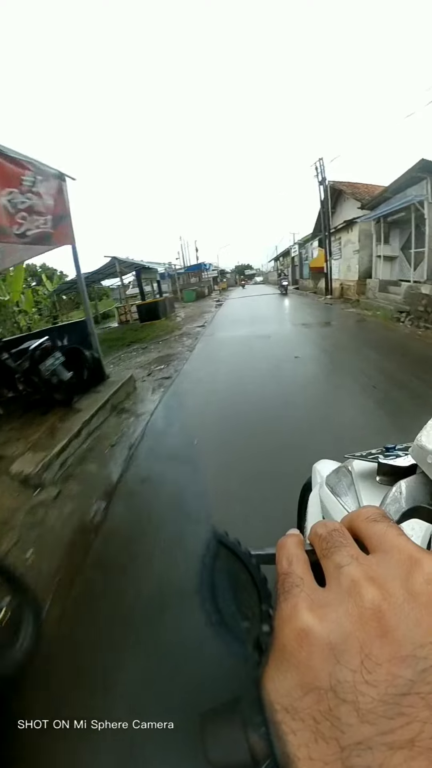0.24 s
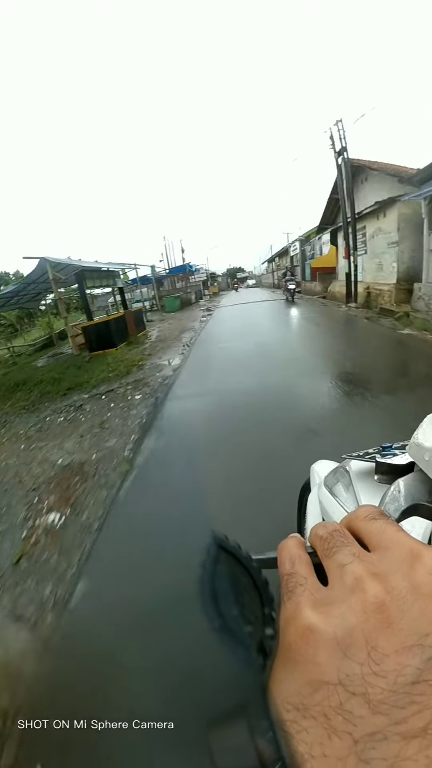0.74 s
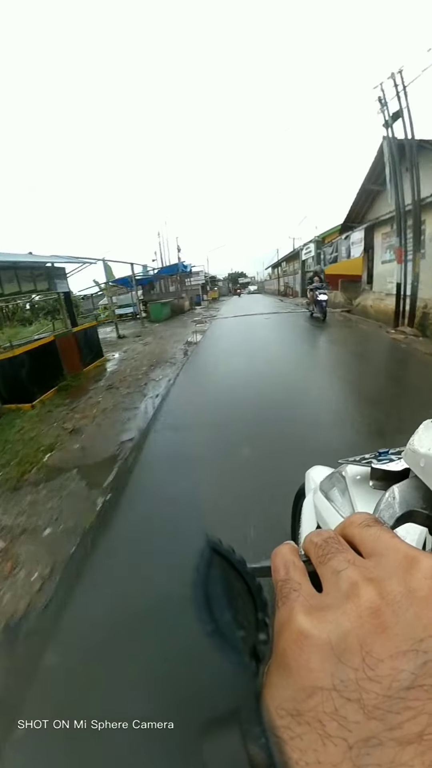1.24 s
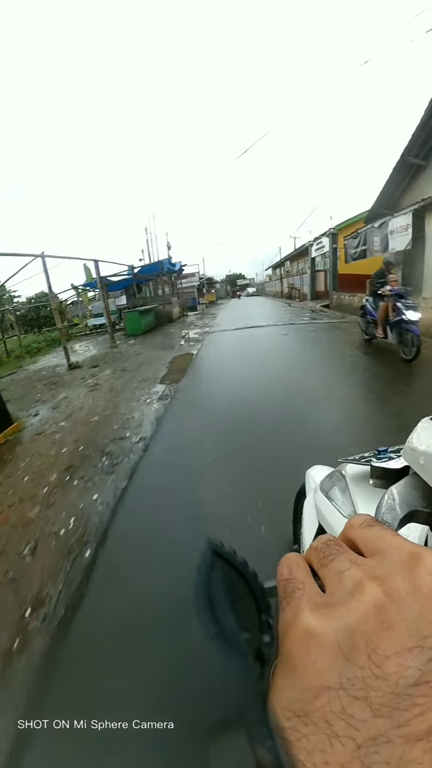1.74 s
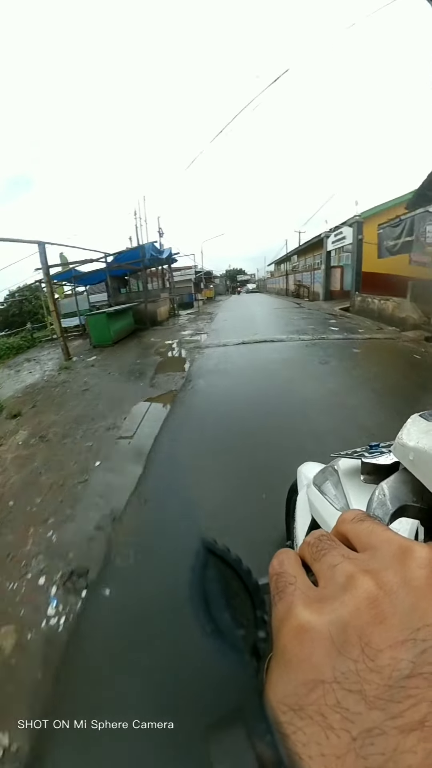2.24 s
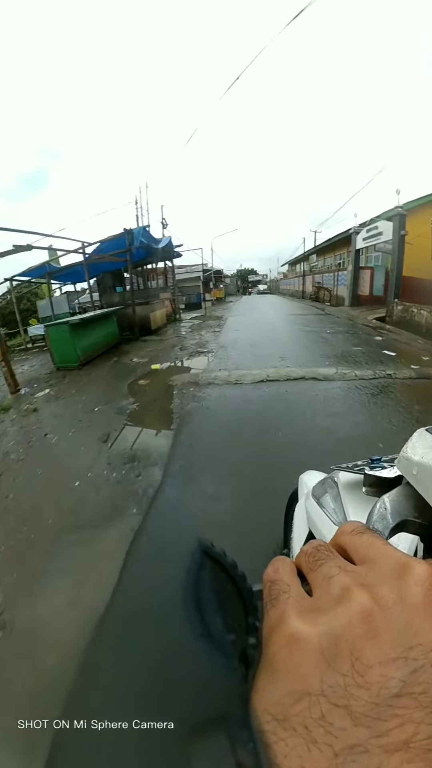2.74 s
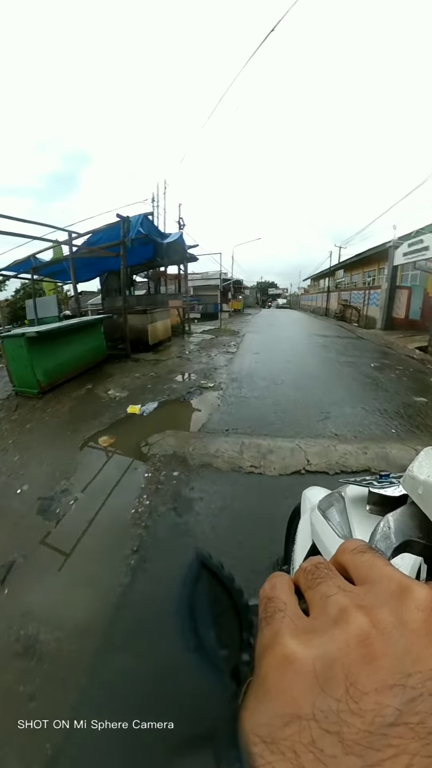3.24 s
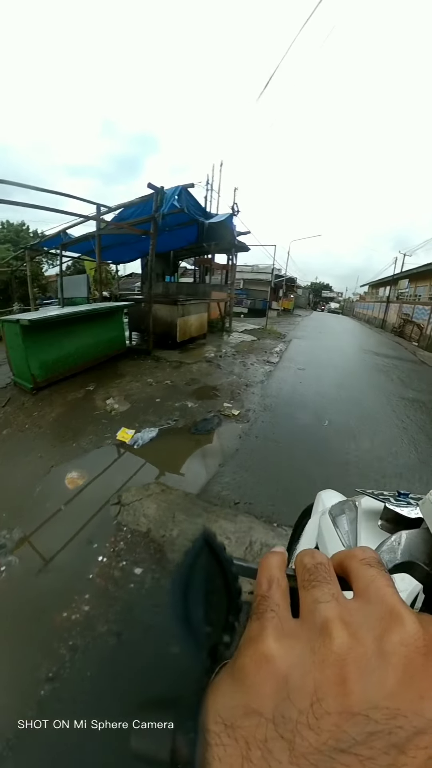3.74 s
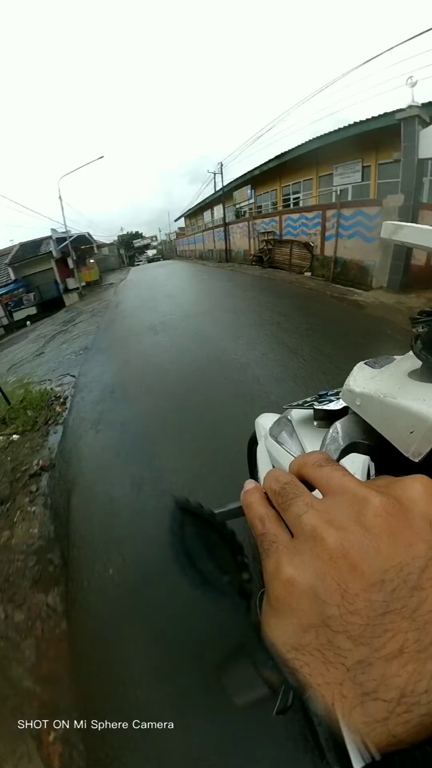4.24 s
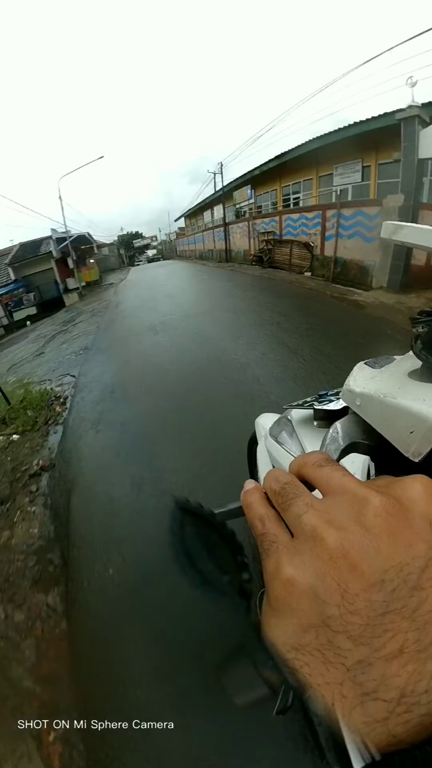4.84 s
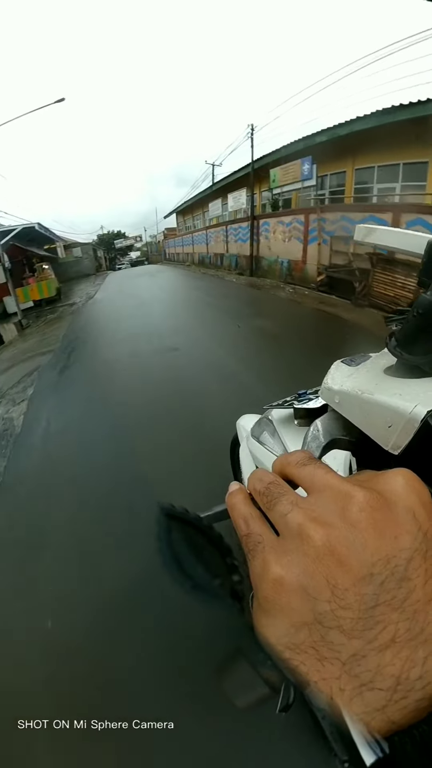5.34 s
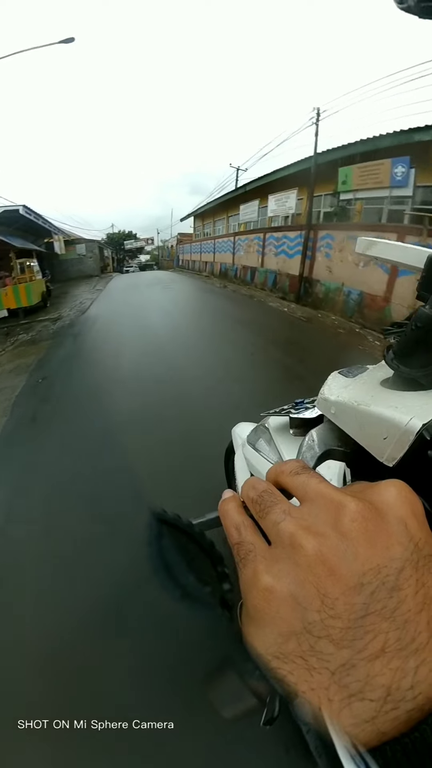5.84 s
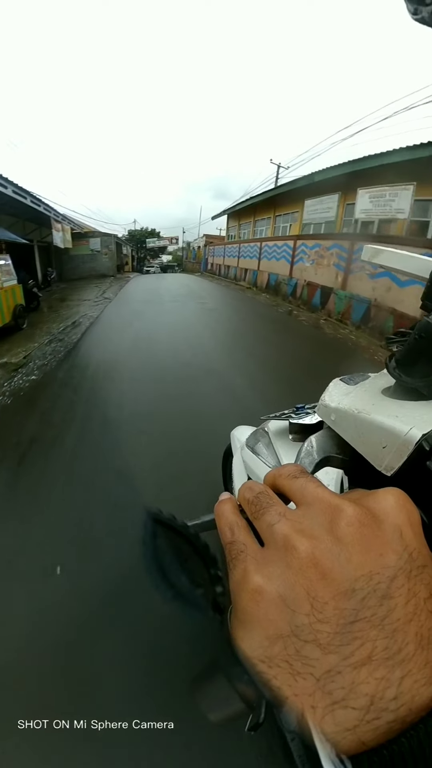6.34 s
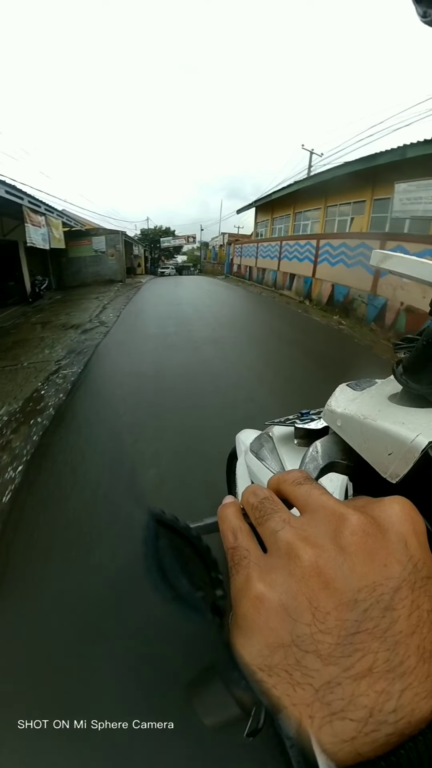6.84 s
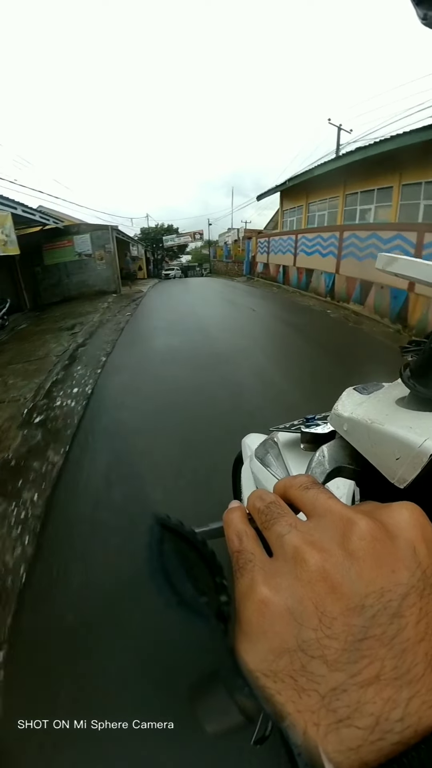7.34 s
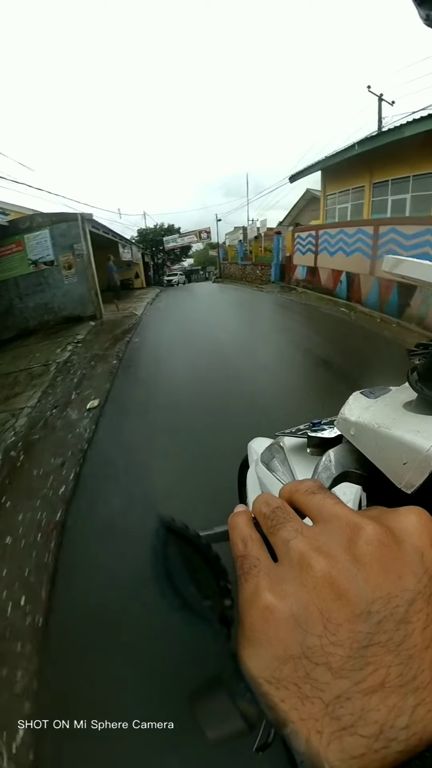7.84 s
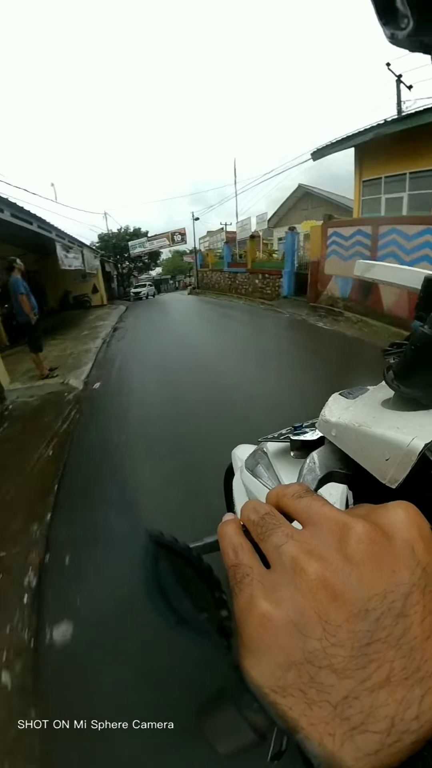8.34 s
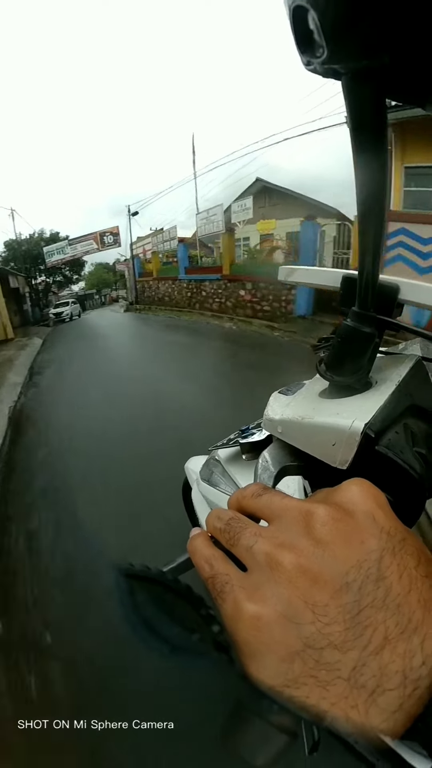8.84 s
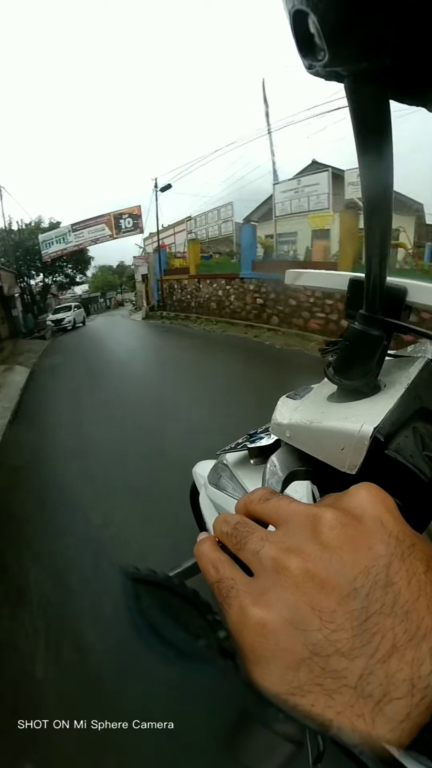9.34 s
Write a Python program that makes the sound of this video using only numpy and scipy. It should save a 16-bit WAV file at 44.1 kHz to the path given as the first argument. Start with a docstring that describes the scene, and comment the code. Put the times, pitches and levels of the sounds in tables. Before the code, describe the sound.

From 0 to 3.5 seconds a scooter coasts and slows on a wet road, heard close at the handlebar: low soft putter, fading belt whirr, broad tyre hiss and faint microphone hiss. Light plastic ticks come near 1.4 and 1.6, with a short high squeak at 1.55 and another scooter's whirr passing around 1.7. A faint panel drone swells near 2.1. Brake rub rises toward 2.9, faintly singing; panels clatter over a low bump at 3.2-3.55. From 3.6 to about 4.25 there is silence. Sound returns with very loud electrical pops at 4.4, 4.6 and 5.1, each ducking the rest before it recovers; a small puddle splash at 4.7 is mostly buried. The engine now pulls at a faster putter, belt whirr and thin rising whine strongest around 6.5-7.5, with dry panel knocks from 6 to 7.4. It eases slightly, rattles at 8.7-8.85, ticks at 9.2 and continues to 9.6.

```python
"""Scooter on a wet village road

Heard from the handlebar: the scooter coasts on hissing tyres, squeaks as another scooter passes, brakes
and rattles over a bump. The microphone cuts out and comes back with electrical pops into a limiter.
Then the engine pulls: low harmonics and gated noise make its putter, band-shaped noise the belt drive,
a gliding sine the thin whine, and short decaying rings with noise cracks the ticks of the panels."""
import sys
import numpy as np
from scipy import signal
from scipy.fft import rfft, irfft, next_fast_len
from scipy.io import wavfile
from scipy.ndimage import map_coordinates

SR = 44100
rng = np.random.default_rng(int(sys.argv[2]) if len(sys.argv) > 2 else 0)


def store_wav(level_fs):
    """Save 16-bit WAV to argv[1]."""
    pcm = np.round(np.clip(np.atleast_2d(level_fs), -1, 1) * 32767)
    wavfile.write(sys.argv[1], SR, pcm.T.astype(np.int16))


N = 422919  # samples, about 9.6 s

# Noise of belt and rollers in their case: (frequency [Hz], density [dB per Hz, relative])
DRIVE_SPECTRUM = [(900, -44), (1150, -13.5), (1300, -6.5), (1460, -1.5), (1620, -4), (1740, 0.5),
                  (1900, -3), (2050, -11), (2220, -15), (2380, -12.5), (2520, -15), (2680, -6), (2900, -16),
                  (3150, -23), (4000, -33.5), (6000, -62)]
# Noise of the plastic bodywork: (frequency [Hz], density [dB per Hz, relative])
PANEL_SPECTRUM = [(300, -20), (600, -23.5), (950, -5.5), (1150, -12.5), (1750, 7), (2350, -4), (2780, 3.5),
                  (3000, -14.5), (3300, -14.5), (6000, -35.5), (10000, -50)]


def amp(db):
    """Decibels to gain."""
    return 10 ** (np.asarray(db) / 20)


def unit(x):
    """Scale to rms 1."""
    return x / np.sqrt(np.mean(x ** 2) + 1e-20)


def curve(rows):
    """One value per sample from (time [s], value) rows."""
    return np.interp(np.arange(N) / SR, *np.transpose(rows))


def swell(at_s, width_s):
    """A bell-shaped gain round one moment."""
    return np.exp(-((np.arange(N) / SR - at_s) / width_s) ** 2)


def stroke(start_s, end_s, attack, release):
    """Full gain from start to end; attack and release are seconds per 20 dB."""
    t = np.arange(N) / SR
    before = np.maximum(start_s - t, 0)
    after = np.maximum(t - end_s, 0)
    return amp(-20 * (before / attack + after / release))


def wobble(rate):
    """A smooth random curve with rate knots a second."""
    knots = rng.standard_normal(int(N * rate / SR) + 4)
    return map_coordinates(knots, [np.arange(N) * rate / SR])


def filtered(x, response):
    """Shape x by a gain that is a function of frequency."""
    m = next_fast_len(N + 8192)
    gain = response(np.fft.rfftfreq(m, 1 / SR))
    return irfft(rfft(x, m) * gain, m)[:N]


def coloured(x, spectrum):
    """Filter x through (frequency [Hz], gain [dB]) points on a log axis, falling away beyond the ends."""
    f, db = np.transpose(spectrum)
    knots = np.log(np.r_[f[0] / 2, f, f[-1] * 2])
    levels = np.r_[db[0] - 20, db, db[-1] - 20]
    return filtered(x, lambda hz: amp(np.interp(np.log(hz + 1), knots, levels)))


def noise(spectrum, gate=1):
    """Gated white noise through a fixed resonant body, rms 1."""
    return unit(coloured(gate * rng.standard_normal(N), spectrum))


def tone(hz):
    """A sine of rms 1 that follows a pitch curve."""
    return np.sqrt(2) * np.sin(2 * np.pi * np.cumsum(hz) / SR)


def puffs(cycle, depth, sharpness):
    """A gate that swells once in each firing cycle."""
    return 1 + depth * np.exp(sharpness * (np.cos(2 * np.pi * cycle) - 1))


def engine(firing_hz, throttle, hum_db, exhaust_db):
    """Low harmonics of the firing rate, and a puff of gas through the silencer at every firing."""
    # (multiple of the firing rate, coasting level [dB], pulling level [dB])
    harmonics = [(1, -34, -8), (2, -22, 2.5), (3, 0, -14.5), (5, -8, -22), (6, -11, -9.5), (7, -14, -6.5),
                 (9, -9, -9), (10, -11, -20), (11, -14, -18)]
    # Exhaust noise while coasting, then pulling: (frequency [Hz], density [dB per Hz, relative])
    coast_spectrum = [(35, -35), (60, -12), (90, -10), (160, -12.5), (220, -17), (280, -4.5), (335, -7),
                      (400, -0.5), (470, -1.5), (530, -8.5), (600, -19), (720, -9.5), (930, -4.5),
                      (1100, -6.5), (1500, -36)]
    pull_spectrum = [(35, -29), (52, -16.5), (100, -11.5), (200, -12), (290, -11), (345, -7), (410, -1),
                     (470, -1), (530, -3), (600, -12.5), (720, -11), (940, -5.5), (1100, -15), (1500, -40)]
    hum = np.zeros(N)
    for multiple, coast_db, pull_db in harmonics:
        level_db = coast_db + throttle * (pull_db - coast_db) + 2.3 * wobble(8)
        hum += amp(level_db) * tone(round(multiple) * firing_hz)
    gate = puffs(np.cumsum(firing_hz) / SR, depth=0.483, sharpness=2.7) * amp(1.1 * wobble(45))
    coasting = amp(-1.42) * (1 - throttle) * noise(coast_spectrum, gate)
    pulling = throttle * noise(pull_spectrum, gate)
    exhaust = amp(exhaust_db) * (coasting + pulling)
    return amp(hum_db) * hum + boom(firing_hz, throttle) + exhaust


def boom(firing_hz, throttle, coast_db=-52, fade_db_per_s=5.5, load_at_s=6.65, load_width_s=1.1,
         fourth_db=-59.5, tenth_db=-60):
    """The silencer booms on two harmonics: the fourth fades while coasting, and both swell under load."""
    coasting = (1 - throttle) * amp(coast_db - fade_db_per_s * np.arange(N) / SR)
    loaded = amp(fourth_db) * swell(load_at_s, load_width_s)
    fourth = (coasting + loaded) * amp(1.3 * wobble(6.5))
    tenth = throttle * amp(tenth_db + wobble(6)) * swell(load_at_s, 2.0 * load_width_s)
    return fourth * tone(4 * firing_hz) + tenth * tone(10 * firing_hz)


def speed_level(speed_hz, throttle):
    """Exhaust level in dB: it follows road speed, coasting or pulling, down to an idle floor."""
    # (level at the start of the coast [dB], loss while coasting [dB per 100 Hz of whine pitch],
    #  level pulling at top speed [dB], loss below top speed [dB per 100 Hz])
    exhaust_law = (-44.8, 7, -45.4, 2.6)
    idle_db = -59.5
    coast_db, coast_slope, pull_db, pull_slope = exhaust_law
    slowed = (speed_hz[0] - speed_hz) / 100
    below_top = (speed_hz.max() - speed_hz) / 100
    coasting = (1 - throttle) * (coast_db - coast_slope * slowed)
    pulling = throttle * (pull_db - pull_slope * below_top)
    return np.maximum(coasting + pulling, idle_db)


def belt_drive(firing_hz, throttle, shake_db, clutch_out_s=3.05, clutch_fade=0.25):
    """Belt and rollers chatter in their ringing case; the belt runs down as the scooter crawls."""
    # Whirr before the trims below, building under load: (time [s], level [dB])
    whirr_level = [(0, -42), (0.6, -45.5), (1.3, -48.5), (2.2, -48.5), (3.05, -54), (4.3, -42),
                   (5.8, -38.5), (6.45, -34.5), (7.6, -34.8), (8.6, -38), (9, -40.5), (9.58, -40)]
    gate = puffs(np.cumsum(firing_hz) / SR, depth=0.19, sharpness=3) * amp(1.19 * wobble(220))
    # the clutch fades are in seconds per 20 dB
    clutch = np.maximum(throttle, stroke(0, clutch_out_s, clutch_fade, clutch_fade))
    level_db = curve(whirr_level) + shake_db - 3.0 + 1.218 * throttle + 0.65 * wobble(12)
    return clutch * amp(level_db) * noise(DRIVE_SPECTRUM, gate)


def whine(speed_hz, ring_hz=1735, ring_db=-42, ring_at_s=7.044, ring_width_s=0.483):
    """The whine swells at each case resonance it crosses; near top speed the case sings its own note."""
    # Resonances of the drive case: (frequency [Hz], half width at half gain [Hz], level [dB])
    case_modes = [(1191.8, 18.5, -56), (1430, 10, -48), (1458, 13, -36), (1515, 30, -51), (1551, 10, -42)]
    sweep = sum(amp(db) / (1 + ((speed_hz - hz) / width) ** 2) for hz, width, db in case_modes)
    ring = amp(ring_db) * swell(ring_at_s, ring_width_s)
    out = np.zeros(N)
    for hz, gain in ((speed_hz, sweep), (ring_hz, ring)):
        pitch = hz * (1 + 0.005 * wobble(90))
        out += gain * amp(1.8 * wobble(35)) * tone(pitch)
    return out


def tyres(puddle_at_s=4.66, splash_db=-52):
    """The tread flings water off the asphalt in a fine spray, and splashes through one puddle."""
    # Wet hiss before an 8.5 dB lift: (time [s], level [dB])
    wet_level = [(0, -56.5), (2.6, -58), (3.58, -60.5), (4.3, -64.5), (6.3, -66), (7, -70.5), (9.58, -70)]
    # Hiss of the tread, then the splash: (frequency [Hz], density [dB per Hz, relative])
    tyre_spectrum = [(100, 3.5), (600, -5.5), (900, 8), (1100, -3), (1250, 2), (1800, 7.5), (2350, -2),
                     (2700, 10), (2900, 7.5), (3150, -4.5), (3900, -2.5), (4550, -1.5), (5000, -5),
                     (5800, -6.5), (6600, -9.5), (7600, -22.5), (12000, -46.5)]
    spray_spectrum = [(2500, -10.5), (4300, 4), (5100, -6.5), (5900, -3), (7000, -13.5), (9000, -21.5)]
    burst = amp(splash_db) * stroke(puddle_at_s, puddle_at_s, attack=0.035, release=0.098)
    splash = burst * noise(spray_spectrum, amp(2.1 * wobble(400)))
    hiss_db = curve(wet_level) + 8.5 + 0.48 * wobble(7.1)
    return splash + amp(hiss_db) * noise(tyre_spectrum, amp(1.0 * wobble(500)))


def panel_drone(hz=380, db=-62.5, at_s=2.108, width_s=0.7):
    """A body panel drones at its resonance: an unsteady tone that swells and fades once."""
    pitch = hz * (1 + 0.012 * wobble(40))
    return amp(db + 2.5 * wobble(22)) * swell(at_s, width_s) * tone(pitch)


def rattles(t60_s=0.028, crack_t60_s=0.0135, ring_db=-4, crack_db=-2):
    """Plastic panels tap together: a short ring and a crack coloured by the bodywork."""
    # Loose panels knock: (time [s], level before the ring and crack trims [dB], main ring [Hz])
    knocks = [(1.3586, -31, 2866), (1.6163, -28, 2842), (2.9367, -31.5, 2080), (3.2036, -27, 2665),
              (3.3107, -22, 2626), (3.5286, -35, 2860), (3.5568, -36, 2680), (6.0004, -25.5, 2080),
              (6.2027, -24, 2600), (6.6648, -22, 2024), (6.8699, -26, 2610), (7.3841, -24, 2100),
              (9.208, -27, 2080)]
    t = np.arange(SR // 10) / SR
    out, crack = np.zeros(N + len(t)), noise(PANEL_SPECTRUM)
    for s, db, hz in list(knocks) + chatter():
        start = round(s * SR)
        ring = amp(ring_db - 60 * t / t60_s) * np.sin(2 * np.pi * hz * t)
        snap = amp(crack_db - 60 * t / crack_t60_s) * crack[start:start + len(t)]
        onset = 1 - np.exp(-t / 0.00072)
        out[start:start + len(t)] += amp(db) * (ring + snap) * onset
    return out[:N]


def chatter(count=3, scatter_db=2, scatter_pitch=0.078):
    """Uneven ground scatters light taps through each burst: rows of (time [s], level [dB], ring [Hz])."""
    # (from [s], to [s], central level before the trims [dB], central ring [Hz])
    bursts = [(3.295, 3.335, -33, 2710), (3.36, 3.44, -40, 2500), (8.69, 8.85, -29, 1572)]
    taps = []
    for start, end, db, hz in bursts:
        for k in range(count):
            at = start + (end - start) * (k + rng.random()) / count
            level_db = db + scatter_db * rng.normal()
            taps.append((at, level_db, hz * np.exp(scatter_pitch * rng.normal())))
    return taps


def brake(sing_hz=2765, sing_db=-52, release=0.11):
    """The pad rubs at each press; in the long first press it also sings faintly."""
    # (fully on [s], let go [s], level [dB], rise [s per 20 dB])
    presses = [(2.76, 2.928, -46, 0.59), (3.336, 3.398, -52.5, 0.15), (3.565, 3.568, -50, 0.01)]
    rub = sum(amp(db) * stroke(on, off, rise, release) for on, off, db, rise in presses)
    on, off = presses[0][:2]
    sing_gain = amp(sing_db + 2.0 * wobble(200)) * stroke(on, off, attack=0.2, release=0.037)
    sing = sing_gain * tone(sing_hz * (1 + 0.00846 * wobble(300)))
    return sing + rub * noise(PANEL_SPECTRUM, amp(2.2 * wobble(150)))


def squeak(start_s=1.535, end_s=1.57, hz=2960, db=-42, scoop_hz=90, scoop_s=0.02):
    """The wet brake pad squeaks once, sliding up to an unsteady note."""
    unsteady = hz * (1 + 0.01204 * wobble(60) + 0.0087 * wobble(300))
    pitch = unsteady - scoop_hz * swell(start_s, scoop_s)
    gain = amp(db + 2.6 * wobble(200)) * stroke(start_s, end_s, attack=0.022, release=0.11)
    return gain * tone(pitch)


def bump(at_s=3.37, width_s=0.13, thud_hz=60, db=-58):
    """The suspension rumbles as the wheels cross the bump: a low, wavering tone."""
    return amp(db) * swell(at_s, width_s) * tone(thud_hz * (1 + 0.14 * wobble(40)))


def oncoming(at_s=1.741, width_s=0.265, db=-51):
    """The whirr of another scooter swells and fades as it passes."""
    return amp(db) * swell(at_s, width_s) * noise(DRIVE_SPECTRUM)


def pops():
    """Each pop is a voltage step that leaks away; the input's bass filter makes it swing back as a thump."""
    # (time [s], step before filtering [dB], discharge time constant [s])
    voltage_steps = [(4.3771, -5.3, .001), (4.4454, -5, .001), (4.4487, 5, .0009), (4.4538, 3.5, .0009),
                     (4.626, 0, .022), (4.6428, -15, .017), (5.1299, 6, .08)]
    # Filter on the pops: (frequency [Hz], gain [dB])
    pop_colour = [(25, -35), (42, -14), (60, -6), (100, -1), (1000, -0.5), (3000, -2), (5000, -6.5),
                  (6500, -17), (8200, -29), (10000, -26), (12000, -22), (15500, -16)]
    t = np.arange(SR) / SR
    steps = np.zeros(N)
    for s, db, leak_s in voltage_steps:
        steps[round(s * SR):][:len(t)] += amp(db) * np.exp(-t / leak_s)
    bass_cut = signal.butter(4, 60, "high", fs=SR, output="sos")
    return coloured(signal.sosfilt(bass_cut, steps), pop_colour)


def limiter(x, ceiling_db, release_db_per_s):
    """Gain drops at once on a peak and recovers at a steady rate."""
    over = np.maximum(20 * np.log10(np.abs(x) + 1e-9) - ceiling_db, 0)
    recovery = release_db_per_s * np.arange(N) / SR
    return x * amp(recovery - np.maximum.accumulate(over + recovery))


def scene(throttle_opens_s=4, jolt_width_s=0.025):
    """All parts of the scooter and its road, summed close to one microphone on the handlebar."""
    # Road speed, as the pitch of the drive's whine: (time [s], pitch [Hz])
    road_speed = [(0, 1205), (3.6, 935), (4.25, 1370), (5.6, 1414), (6.32, 1473), (6.75, 1538), (7.4, 1554),
                  (7.85, 1546), (9.59, 1484)]
    # Engine speed: (time [s], firings per second [Hz])
    firing_rate = [(0, 29.3), (1.2, 29.1), (2.85, 27.6), (3.6, 28.7), (4.25, 55.2), (6.2, 54.9),
                   (7.7, 53.4), (8.3, 52), (9.59, 49.8)]
    # Engine hum, on top of each harmonic's own level: (time [s], level [dB])
    hum_level = [(0, -56), (1, -55.5), (2, -60), (3, -61), (3.58, -58), (4.3, -72), (5.6, -77.5),
                 (7.5, -59), (8.05, -64.5), (8.6, -57), (9.2, -65.5), (9.58, -59)]
    # Ridges of coarse asphalt shake the exhaust and belt noise: (time [s], level added [dB])
    jolts = [(8.71, 4), (8.78, 3.5), (8.84, 2.5)]
    speed_hz = curve(road_speed)
    firing_hz = curve(firing_rate) * (1 + 0.00403 * wobble(14))
    throttle = (np.arange(N) / SR > throttle_opens_s).astype(float)
    shake_db = sum(db * swell(s, jolt_width_s) for s, db in jolts)
    exhaust_db = speed_level(speed_hz, throttle) + shake_db
    motor = engine(firing_hz, throttle, curve(hum_level), exhaust_db)
    drive = belt_drive(firing_hz, throttle, shake_db) + whine(speed_hz)
    contacts = panel_drone() + rattles() + brake() + squeak() + bump()
    return (motor + drive + tyres() + contacts + oncoming())[None]


def record(dry, wake_db=-11, wake_s=0.06, top_hz=16200):
    """The microphone hisses, cuts out, and fades back in before its pops; limiter and band limit follow."""
    # The microphone is dead: (from [s], to [s])
    dropout = (3.59, 4.248)
    # Microphone hiss: (frequency [Hz], density [dB per Hz, relative])
    hiss_spectrum = [(2000, -4.5), (6500, -9), (7600, -6.5), (8600, 0), (9600, 2.5), (10500, -1),
                     (12000, -12.5), (14000, -15.5), (15700, -13.5)]
    t = np.arange(N) / SR
    back = t > dropout[1]
    wake = amp(wake_db * np.exp(-np.abs(t - dropout[1]) / wake_s))
    alive = (t < dropout[0]) + back * wake
    hiss = amp(-68.0 - 2.4 * back) * noise(hiss_spectrum)
    held = limiter((dry[0] + hiss) * alive + pops(), ceiling_db=-1, release_db_per_s=90)
    return filtered(held, lambda hz: 1 / (1 + (hz / top_hz) ** 120))[None]


dry = scene()
out = record(dry)
store_wav(out)
```